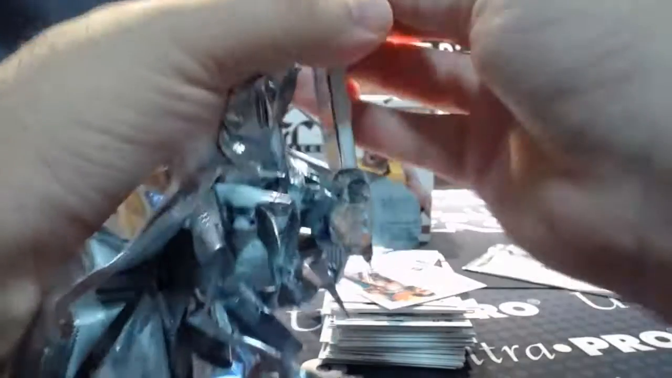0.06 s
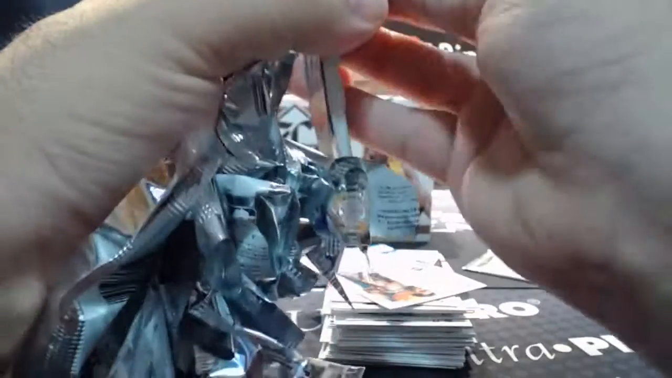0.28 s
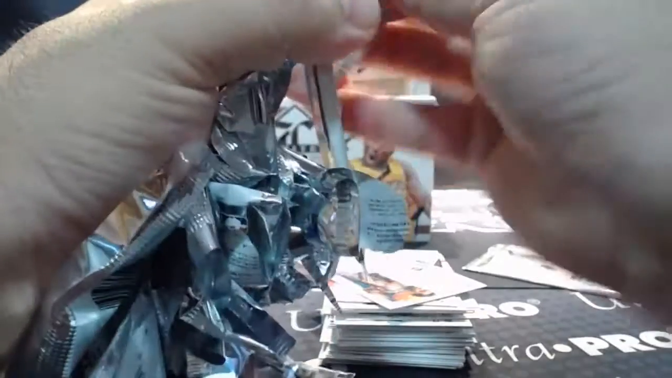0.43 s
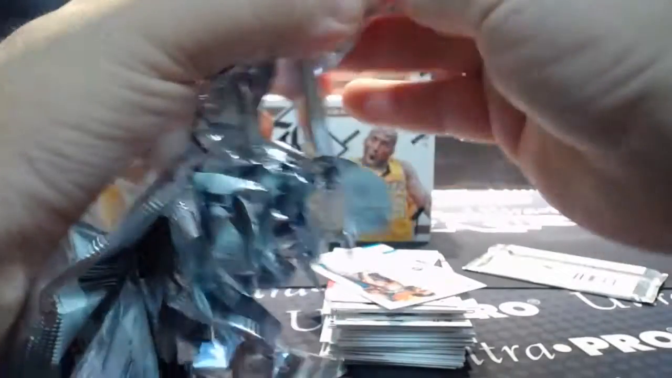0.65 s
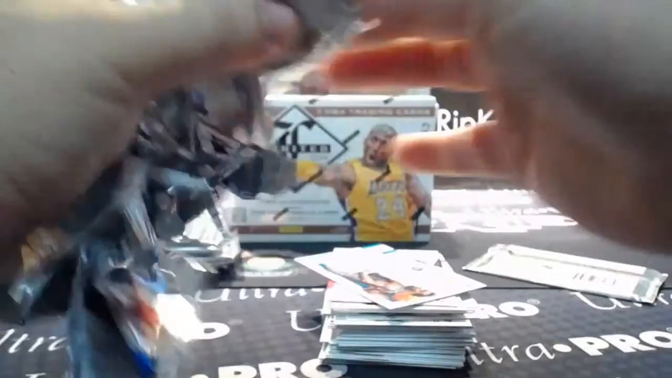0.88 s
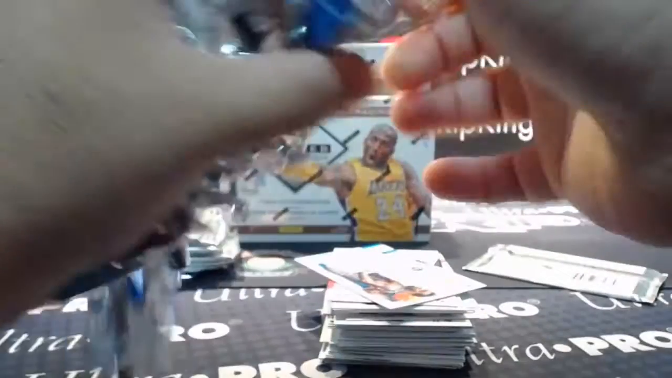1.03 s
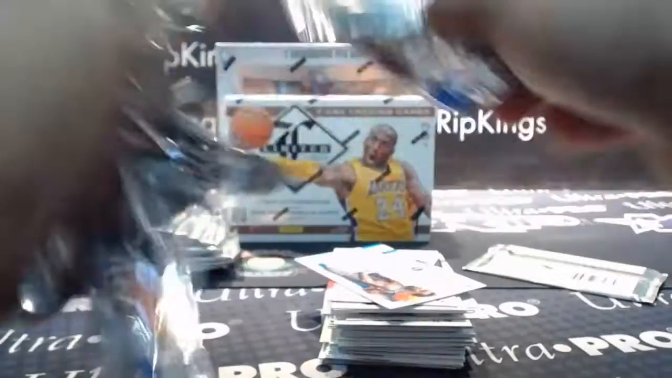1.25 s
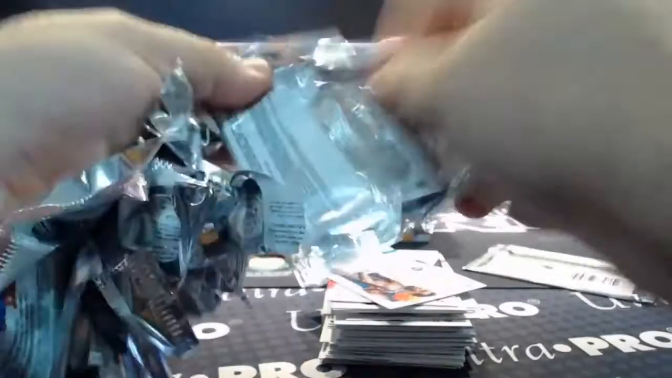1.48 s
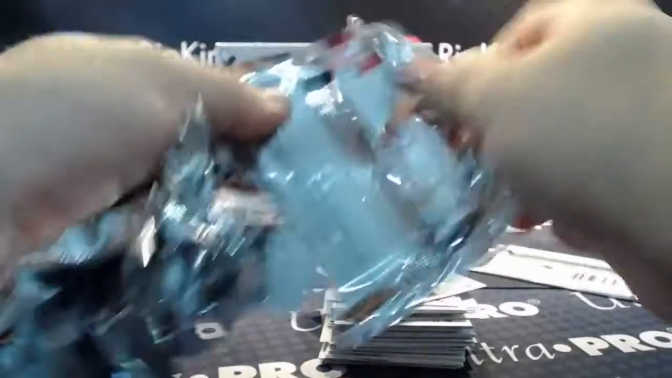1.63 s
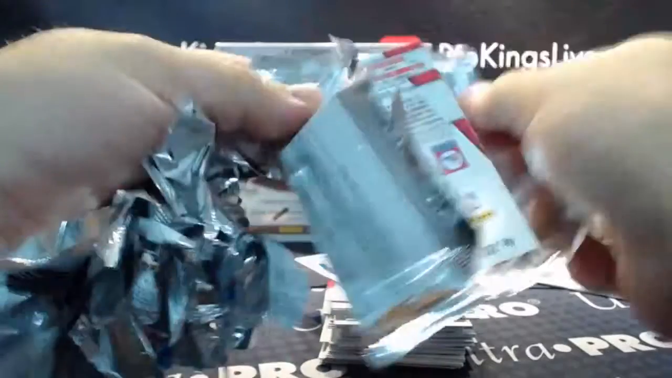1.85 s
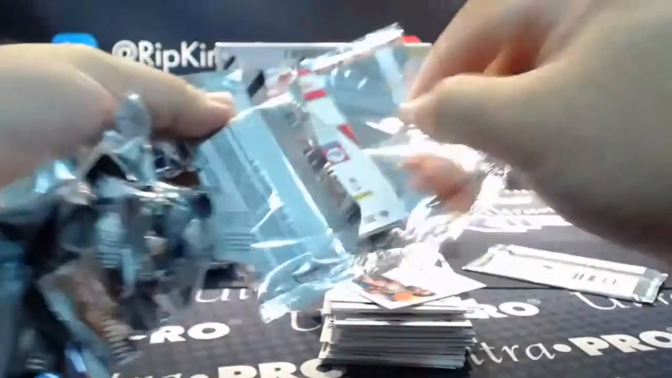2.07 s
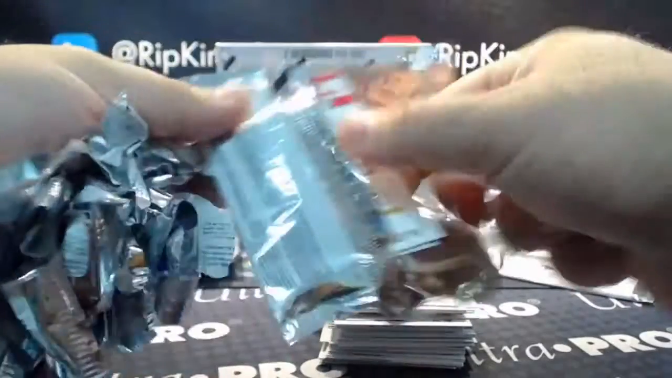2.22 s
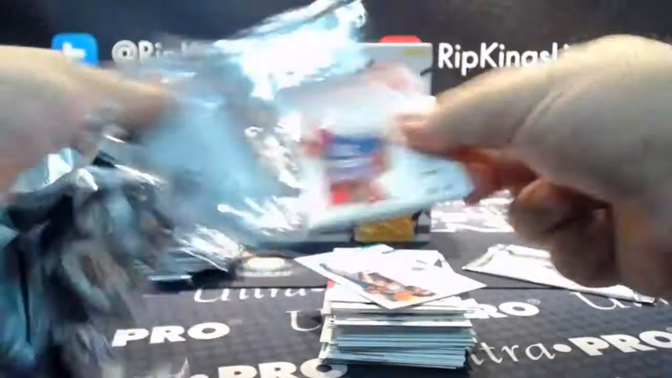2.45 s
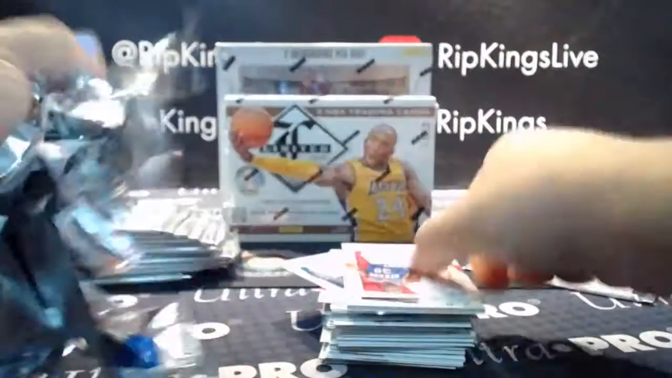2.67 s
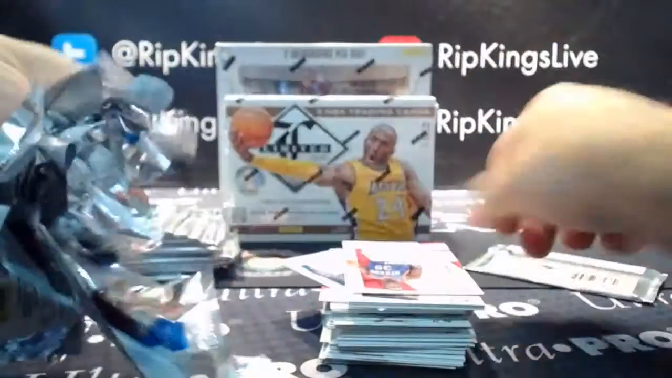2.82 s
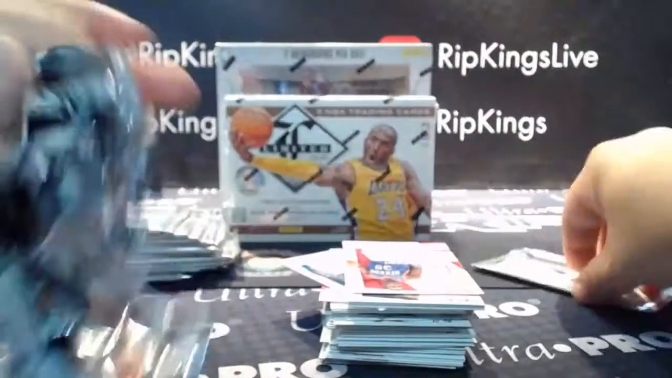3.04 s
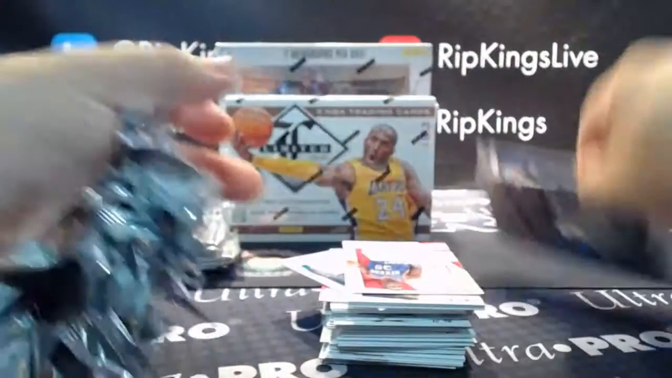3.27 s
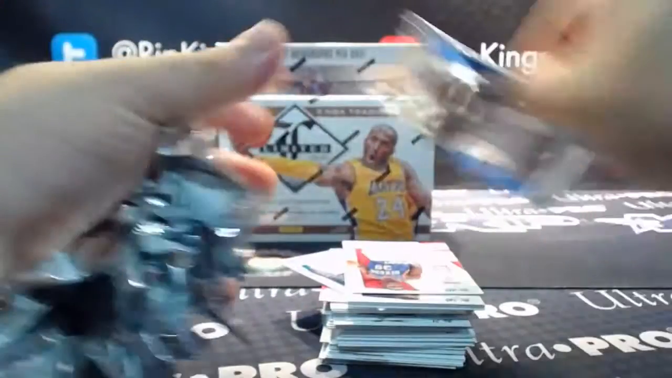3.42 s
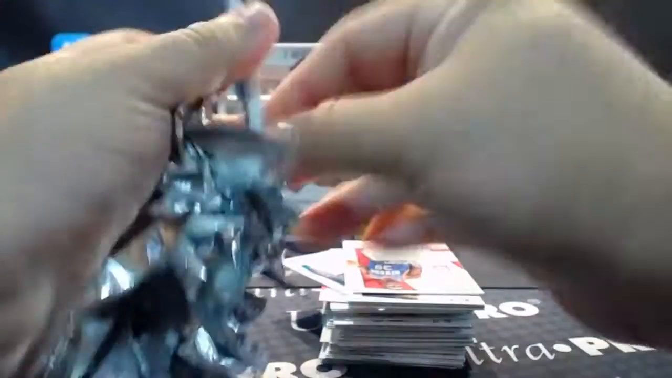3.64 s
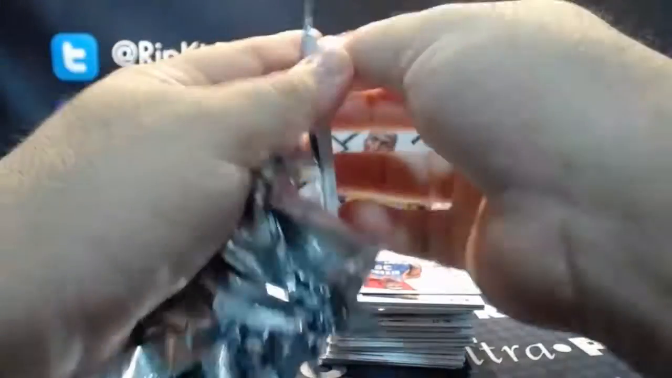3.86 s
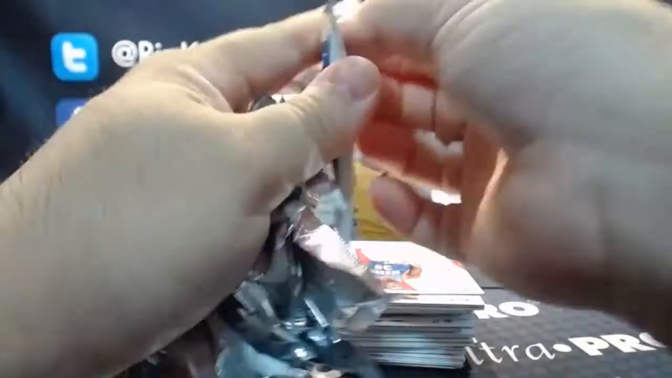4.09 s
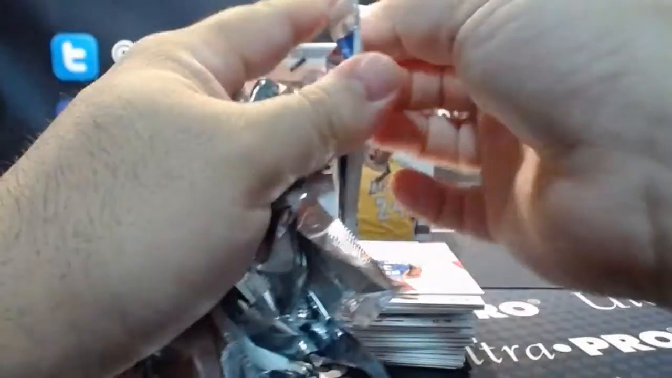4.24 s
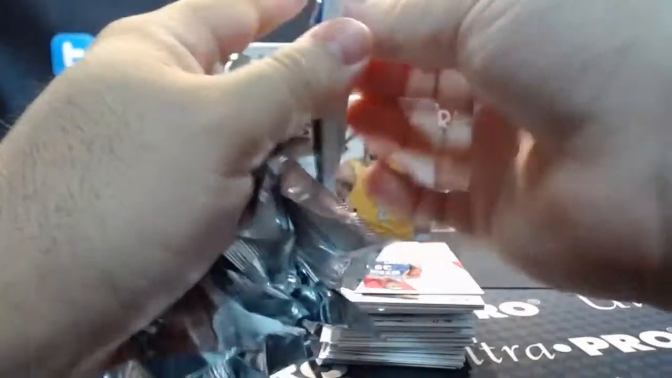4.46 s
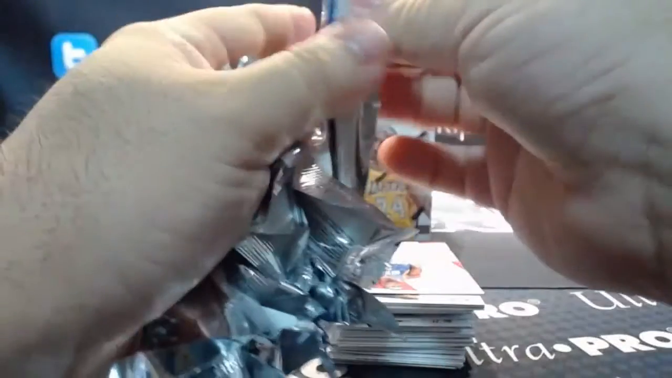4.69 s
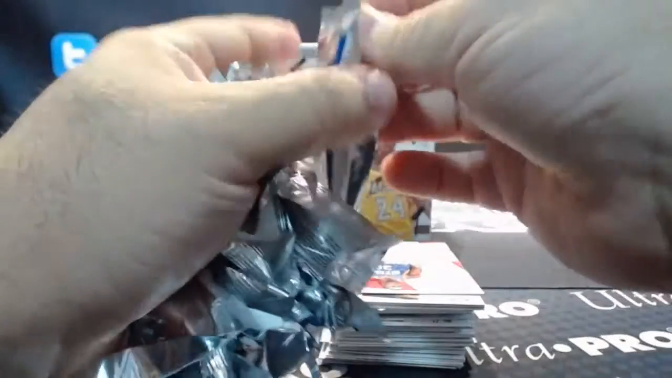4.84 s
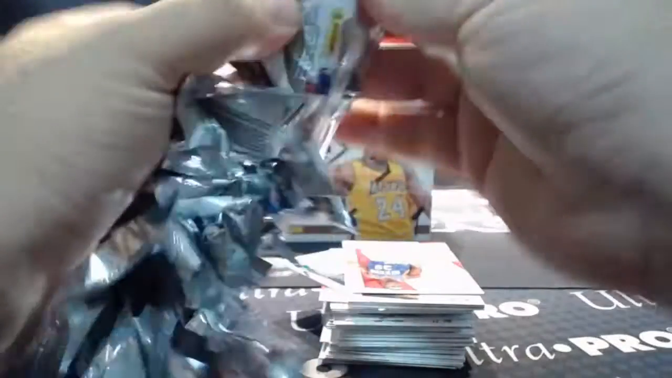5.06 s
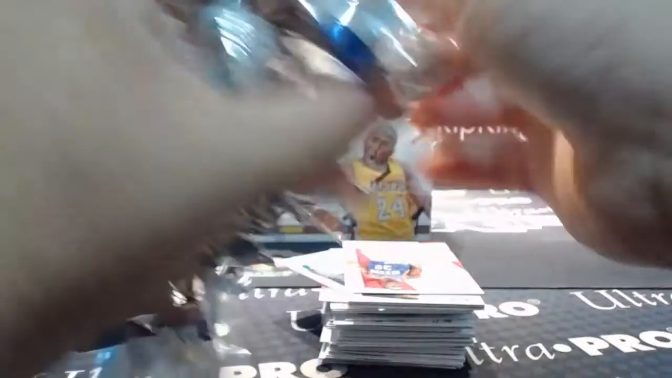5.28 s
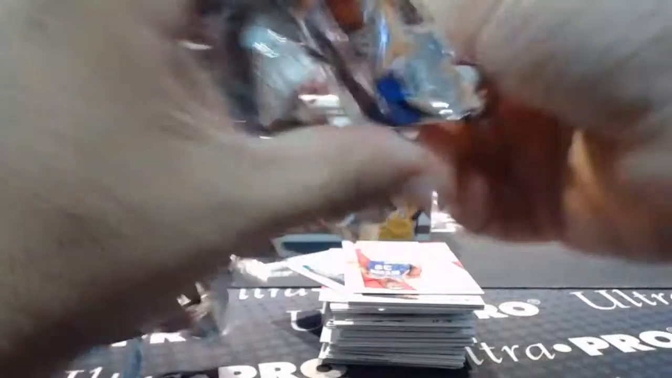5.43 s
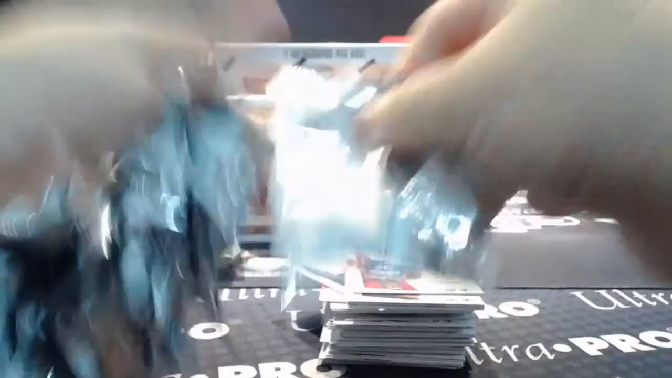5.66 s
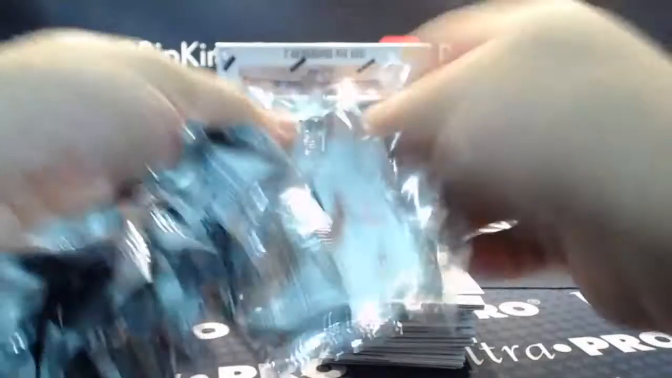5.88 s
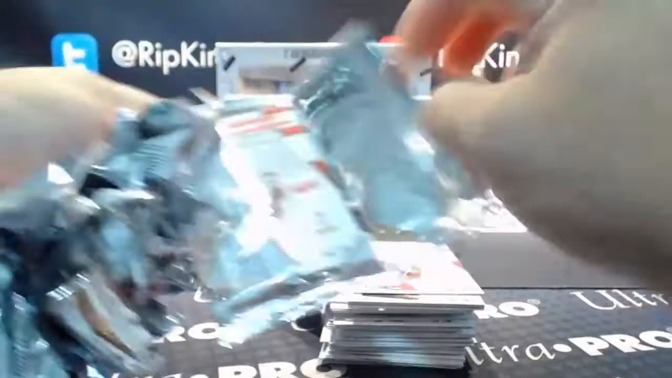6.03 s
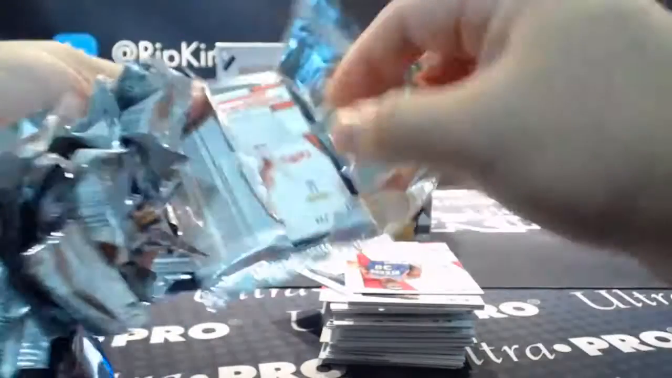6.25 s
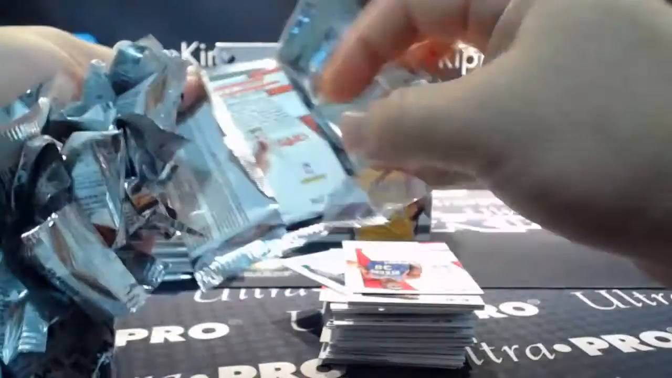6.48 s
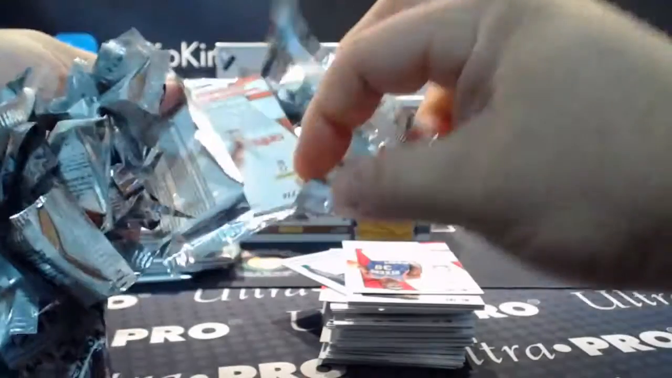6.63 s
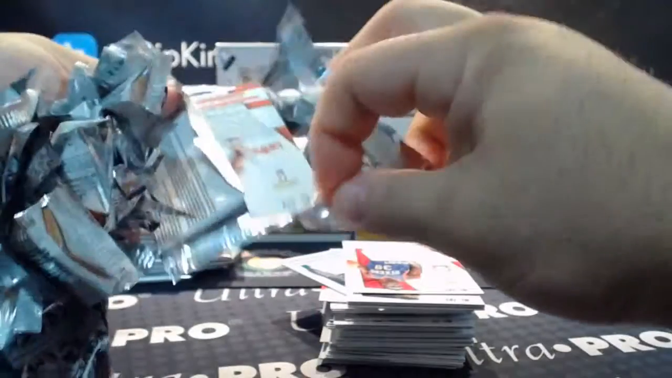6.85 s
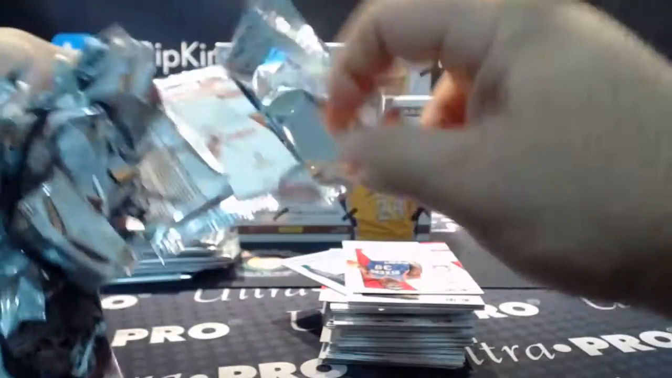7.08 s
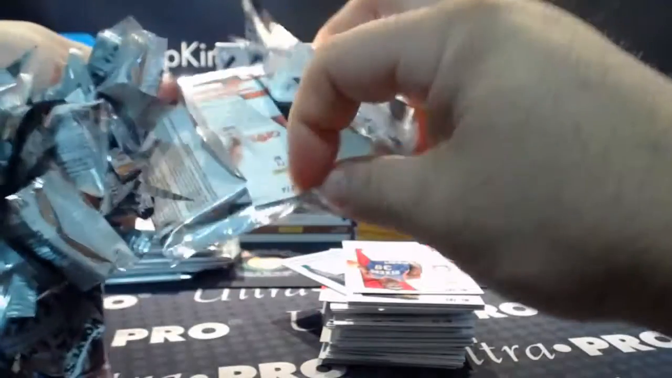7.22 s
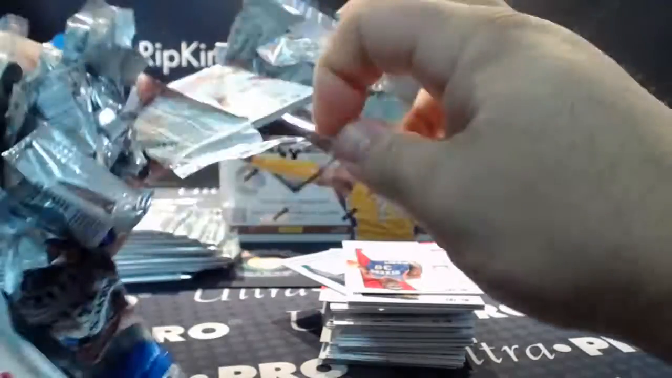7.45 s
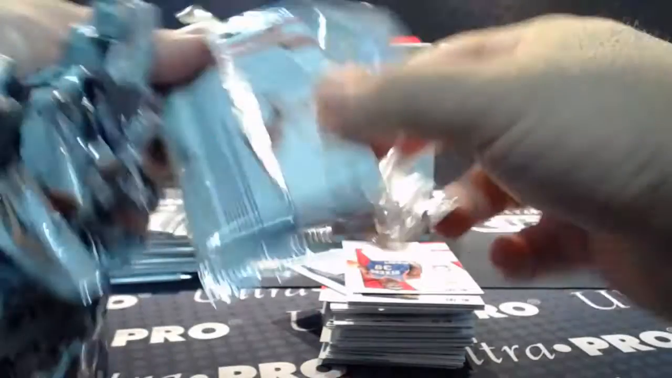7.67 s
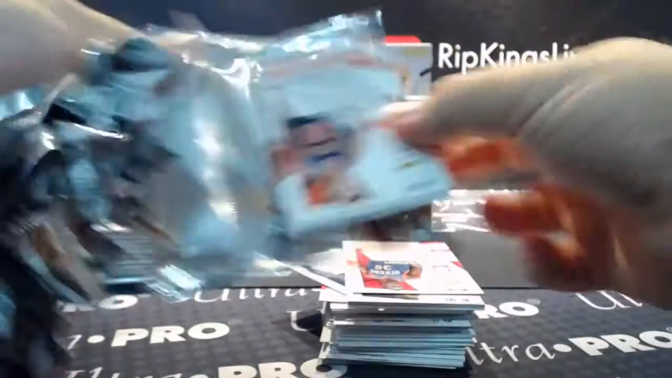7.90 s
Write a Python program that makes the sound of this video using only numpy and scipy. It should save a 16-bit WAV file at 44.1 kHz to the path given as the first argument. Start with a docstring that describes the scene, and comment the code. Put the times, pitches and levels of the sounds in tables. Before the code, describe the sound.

Close up at a desk in a small room, hands open foil packs of trading cards. Light crinkles and separate snaps lead to short loud rips, then stiff cards are worked out with low flexing and a dull knock. A quieter handling stretch follows, then another cluster of strong tears and thuds, fading to sparse ticking. Close stereo pickup, short room tail, faint steady noise and hum.

```python
"""At a desk in a small room, two hands tear open foil packs of trading cards in front of a stereo microphone.
Each squeeze or rip is a swarm of tiny creases buckling, mixed with the hiss of foil sliding on itself.
Larger creases snap one by one and ring briefly; the bunched wrappers tick as they relax.
The pack flexes in low jerks, more strongly while the stiff cards are worked out, and dull knocks are heard.
Near echoes and a short tail make the room, over steady noise and a faint electric hum."""
import sys
import numpy as np
from scipy import signal
from scipy.fft import rfft, irfft
from scipy.io import wavfile
from scipy.ndimage import uniform_filter1d, minimum_filter1d

SR = 44100
rng = np.random.default_rng(int(sys.argv[2]) if len(sys.argv) > 2 else 0)


def store_pcm(level_fs):
    """Save levels as 16-bit WAV."""
    pcm = np.round(np.clip(level_fs, -1, 1) * 32767).astype(np.int16)
    wavfile.write(sys.argv[1], SR, np.atleast_2d(pcm).T)


N = 348831


def amp(db):
    """Decibels to gain."""
    return 10 ** (np.asarray(db) / 20)


def unit(x):
    """Scales to an energy of one."""
    return x / np.sqrt(np.sum(x ** 2, -1, keepdims=True) + 1e-20)


def read(points, hz):
    """Reads a table on a log-frequency axis."""
    f, value = np.transpose(points)
    return np.interp(np.log(hz + 1), np.log(f + 1), value)


def add(mix, s, sound):
    """Mixes a sound in at a time."""
    part = mix[:, max(round(s * SR), 0):][:, :sound.shape[-1]]
    part += sound[..., :part.shape[-1]]


def bins(size=4096):
    """Frequencies on which filters are drawn."""
    return abs(np.fft.fftfreq(size, 1 / SR))


def causal(db):
    """Shortest impulse response with this gain."""
    return np.fft.ifft(np.exp(np.conj(signal.hilbert(np.log(amp(db)))))).real[:len(db) // 2]


def through(x, response):
    """Convolves both channels."""
    return signal.oaconvolve(x, np.atleast_2d(response), axes=1)[:, :N]


# the foil yields while the force is held
SAG_DB_PER_S = 25


def stroke(t, start, length, db, attack_s, release_db_per_s):
    """Power of one pull on the foil: it builds up before start, sags while held, and dies away."""
    age = t - start
    attack = np.clip(1 + age / attack_s, 0, 1) ** 4
    sag_db = SAG_DB_PER_S * np.clip(age, 0, length)
    release_db = release_db_per_s * np.maximum(age - length, 0)
    return attack * amp(db - sag_db - release_db) ** 2


# a seam gives way: (full_force_s, attack_s, length_s, level_db)
RIPS = [(1.297, .025, .033, -21.5), (2.116, .022, 0.055, -16.8), (2.48, .01, .012, -28),
        (5.396, .006, .01, -17), (5.536, .02, 0.01496, -20), (6.192, 0.011, .02, -18.5),
        (6.249, .014, 0.0068, -17)]
RIP_RELEASE_DB_PER_S, RIP_BRIGHT_DB = 678.5, -0.5
# the fingers crumple or pull the foil: (full_force_s, length_s, level_db, brightness_db)
# brightness is the power of the high crackle compared with the low crackle
SQUEEZES = [(.099, 0.034, -41, 5), (.221, .004, -43, 12), (0.47, .04, -35.5, 7), (.54, .03, -44, 5),
            (.622, 0.024, -41, 3), (.709, 0.0091, -36.5, 1.5), (.752, .038, -41, 0),
            (1.228, 0.041, -38, -0.5), (1.278, 0.078, -29, 0.5), (1.463, .1, -35.5, 5),
            (1.51, .018, -32, 2.5), (1.785, .01, -38.5, -3), (1.91, .02, -43, 1.5), (2.08, .015, -44, -4),
            (2.19, .09, -39, -5), (2.298, .014, -29, -5), (2.421, 0.0099, -37.5, -3),
            (2.496, .028, -35, -3), (2.671, 0.017, -37.5, -5), (2.945, 0.024, -45, 2), (3.02, .03, -43, 1),
            (3.054, 0.029, -37, -2.5), (3.269, 0.12, -44, 4), (3.494, .022, -39, 9),
            (3.587, 0.034, -38.5, 2), (4.052, 0.0035, -45, 5), (4.163, 0.011, -52, -9),
            (4.232, 0.011, -45, -5), (4.44, 0.11, -47, -1), (4.792, .01, -38, 14), (4.84, 0.094, -52, -4),
            (5.42, .02, -26, -2), (5.455, .022, -28.5, 0), (5.517, 0.087, -25.5, -1.5),
            (5.692, 0.029, -30, -7), (5.745, .045, -38, 1.5), (5.884, .014, -33, -0.5),
            (5.975, 0.11, -39, -4), (6.166, 0.086, -30, 0), (6.362, .012, -44, -6), (6.437, .035, -37.5, 0),
            (6.543, .012, -50.5, 2), (6.793, 0.0057, -49.5, -1), (7.167, .04, -52, 0),
            (7.236, 0.038, -48, 7), (7.377, 0.028, -56, -1), (7.586, 0.044, -50, 3),
            (7.768, .045, -44.5, 6)]
SQUEEZE_ATTACK_S, SQUEEZE_RELEASE_DB_PER_S = .028, 480
# faint rustle of the wrappers bunched in the hand: (time_s, level_db)
RUSTLE = [(0, -62), (.25, -53), (.55, -67), (.95, -63), (1.6, -50), (2, -58), (2.65, -50), (2.78, -74),
          (2.9, -50), (3.55, -47), (3.72, -59), (4.7, -66), (4.85, -51), (5.1, -59), (5.38, -53),
          (6.35, -53), (6.7, -71), (7.5, -69), (7.9, -61.5)]
RUSTLE_BRIGHT_DB = 1.5
# every snap makes the creases around it crackle on for a moment; the level is relative to the snap
FLURRY_DB, FLURRY_ATTACK_S, FLURRY_RELEASE_DB_PER_S = -21, .002, 477
FLURRY_NEUTRAL_HZ, FLURRY_BRIGHT_DB_PER_OCTAVE = 3000, 15
# the stiff cards are worked out of the opened pack: (start_s, end_s)
UNPACKING = [(1.56, 2.54), (2.8, 3.22), (4.44, 4.81), (5.68, 6.06), (6.24, 7.22)]
# flexing relative to the crackle: with the foil alone, and the part added by the cards
FLEX_FOIL_DB, FLEX_CARDS_DB = -28, -10
# above the knee the cards' part grows more slowly than the crackle; a larger lag slows it more
FLEX_KNEE_DB, FLEX_LAG = -33, .55


def effort():
    """Power over time of low crackle, high crackle and flexing, gathered from everything the hands do."""
    t = np.arange(0, N, 32) / SR  # a coarse clock is enough for hand movements
    parts = [(amp(np.interp(t, *np.transpose(RUSTLE))) ** 2, RUSTLE_BRIGHT_DB)]
    for s, attack, length, db in RIPS:
        power = stroke(t, s, length, db, attack, RIP_RELEASE_DB_PER_S)
        parts.append((power, RIP_BRIGHT_DB))
    for s, length, db, bright_db in SQUEEZES:
        power = stroke(t, s, length, db, SQUEEZE_ATTACK_S, SQUEEZE_RELEASE_DB_PER_S)
        parts.append((power, bright_db))
    for s, db, hz, ring in SNAPS:
        power = stroke(t, s, 0, db + FLURRY_DB, FLURRY_ATTACK_S, FLURRY_RELEASE_DB_PER_S)
        parts.append((power, FLURRY_BRIGHT_DB_PER_OCTAVE * np.log2(hz / FLURRY_NEUTRAL_HZ)))
    low = sum(power / (1 + amp(bright_db) ** 2) for power, bright_db in parts)
    high = sum(power / (1 + amp(-bright_db) ** 2) for power, bright_db in parts)
    unpacking = sum((t > start) & (t < end) for start, end in UNPACKING)
    slowed = (1 + (low + high) / amp(FLEX_KNEE_DB) ** 2) ** FLEX_LAG
    cards = unpacking * amp(FLEX_CARDS_DB) ** 2 / slowed
    flex = (low + high) * (amp(FLEX_FOIL_DB) ** 2 + cards)
    return np.array([np.interp(np.arange(N) / SR, t, power) for power in (low, high, flex)])


def buckles(power, idle_per_s=200, busy_per_s=3200, growth=.55, size_db=5.0, even_s=.014):
    """Clicks of very unequal size that come faster with force and share out the power."""
    rate = idle_per_s + busy_per_s * (np.sqrt(power) * 10) ** growth
    sizes = amp(size_db * np.minimum(rng.exponential(1, N), 4))
    clicks = (rng.random(N) < rate / SR) * sizes
    span = max(int(even_s * SR), 8)
    # even out the loudness, so that crowded clicks are each weaker
    return clicks / np.sqrt(abs(uniform_filter1d(clicks ** 2, span)) + 1 / span)


# colour of crackling foil: (pitch_hz, level_db)
FOIL = [(60, -22), (250, -14), (560, -13), (820, -1.5), (1400, 0), (2000, 2.5), (3000, 1.5), (4300, 1),
        (6500, 2.5), (9000, -3.5), (12500, -10), (16000, -30.5)]


def creases(hz, ring, cycles, tick_s, crack=0, size=256):
    """Buckling creases: a sharp crack, a rough tick and a few cycles of the facet's own tone."""
    # the result has the shape (events, centre and side, samples)
    t = np.arange(size) / SR
    hz, ring = hz[:, None, None], np.clip(ring, 0, 1)[:, None, None]
    tick = unit(rng.standard_normal((len(hz), 2, size)) * np.exp(-t / tick_s))
    tick = np.roll(tick + crack * np.sign(tick) * (t == 0), 8, -1)  # 8 samples later
    colour = rfft(causal(read(FOIL, bins(size=512))), 2 * size)
    tick = unit(irfft(rfft(tick, 2 * size) * colour)[..., :size])
    age = t / (cycles / hz + tick_s / 2)
    wave = np.sin(2 * np.pi * (hz * t + rng.random((len(hz), 2, 1))))
    tone = unit(age * np.exp(-age) * wave)
    return unit(np.sqrt(1 - ring) * tick + np.sqrt(ring) * tone)


def facet_pitch(at, own, patch_s=.009, scatter=.6):
    """Creases that buckle close in time lie on one patch of foil, so their pitches (0-1) are alike."""
    patch = (at / SR / max(patch_s, .002)).astype(int)  # the patch under the fingers keeps changing
    return (rng.random(N)[patch] + scatter * own) % 1


# share of sliding at rest and at full force (0-1), the level halfway between, and the averaging time
SLIDE_REST, SLIDE_FULL, SLIDE_HALF_DB, SLIDE_S = .12, 0.42, -46, 0.064


def sliding_share(power):
    """Under a light touch foil mostly buckles; under sustained force it slides on itself more."""
    held = abs(uniform_filter1d(power, max(int(SLIDE_S * SR), 1)))
    force = held / (held + amp(SLIDE_HALF_DB) ** 2)
    return np.clip(SLIDE_REST + (SLIDE_FULL - SLIDE_REST) * force, 0, 1)


def crackle(low, high, rest_db=-74, split_hz=3500, ring=0.52, lowest_hz=800, highest_hz=9500,
            hiss_hz=9500, jerk_db=2.5, jerk_s=.007):
    """Every click flips a facet of another size, over the hiss of sliding foil, never quite still."""
    clicks, buckling = buckles(low + high), np.zeros((2, N))
    at = np.flatnonzero(clicks)
    pitch, share = rng.random((len(at), 2)).T
    facet_hz = lowest_hz * (highest_hz / lowest_hz) ** facet_pitch(at, pitch)
    grains = creases(facet_hz, 2 * ring * share, cycles=0.71, tick_s=0.00038)
    for i, grain in zip(at, grains):
        add(buckling, i / SR, clicks[i] * grain)
    softer = -10 * np.log10(1 + (bins() / hiss_hz) ** 4)  # sliding has less treble than buckling
    hiss = through(rng.standard_normal((2, N)), unit(causal(read(FOIL, bins()) + softer)))
    sliding = sliding_share(low + high)
    # the foil sticks and gives
    jerks = np.interp(np.arange(N) / SR / jerk_s, np.arange(N), rng.standard_normal(N))
    foil = (np.sqrt(1 - sliding) * buckling + np.sqrt(sliding) * hiss) * amp(jerk_db * jerks)
    dull = signal.sosfiltfilt(signal.butter(3, split_hz, fs=SR, output="sos"), foil)
    layers = ((dull, low), (foil - dull, high))
    rest = amp(rest_db) ** 2 / 2
    return sum(part / part[0].std() * np.sqrt(power + rest) for part, power in layers)


# single large creases snapping through: (time_s, level_db, foil_facet_pitch_hz, ringing_share 0-1)
SNAPS = [(.006, -36, 5200, 0.63), (0.1163, -30, 2210, .6), (0.147, -39, 4800, 0.8),
         (0.2245, -26.5, 7080, 0.74), (.3017, -29, 6600, 0.7), (.551, -29, 4080, 0.3),
         (.603, -31.5, 5660, 0.56), (.6249, -28.5, 3630, 0.3), (.6476, -35.5, 1850, .7),
         (.7, -28.5, 1810, 0.56), (0.7701, -31, 5230, .4), (0.7912, -23, 5040, 0.42),
         (0.906, -35, 1850, 0.82), (.995, -25, 1840, 0.58), (1.063, -17, 1990, 0.87),
         (1.071, -24, 4380, 0.4), (1.1069, -32, 7410, .7), (1.1307, -30, 8470, .2),
         (1.2289, -30.5, 2145, 1), (1.2543, -27.5, 2070, 0.97), (1.272, -20.5, 1860, 0.44),
         (1.3947, -33, 6600, 0.25), (1.5174, -19.5, 6740, 0.3), (1.5545, -20.5, 4855, 0.5),
         (1.571, -27, 1900, 0.7), (1.623, -32, 7550, .1), (1.673, -31, 4900, 0.86),
         (1.6932, -37, 4470, 0.6), (1.7154, -36, 5220, 0.56), (1.778, -31, 2580, 0.7),
         (2.476, -18, 3070, .5), (2.486, -18, 2910, 0.51), (2.682, -28, 3860, 0.56),
         (2.9703, -32, 2845, 0.72), (3.0722, -23.5, 2580, 0.53), (3.1981, -34.5, 5850, 0.66),
         (3.2388, -36, 1182, 0.94), (3.54, -30, 5445, 0.5), (3.8151, -33, 4182, 0.93),
         (3.9322, -37.5, 950, 0.7), (3.9956, -33, 9480, 0.97), (4.2332, -24.5, 8090, 0.6),
         (4.2437, -25, 4080, 0.36), (4.341, -34.5, 6170, 0.8), (4.3807, -36, 3353, 0.92),
         (4.3965, -40.5, 4030, 0.6), (4.4361, -31, 4100, 0.47), (4.449, -32.5, 932, 0.3),
         (4.5019, -33, 5213, .3), (4.61, -38, 6055, 0.57), (4.7895, -22.5, 7110, .75),
         (4.8382, -35.5, 4965, 0.61), (4.8822, -20, 4808, 0.98), (4.928, -36.5, 5210, 0.51),
         (5.1293, -31, 2816, 0.21), (5.286, -37.5, 6915, 0.31), (5.513, -22, 5500, 0.19),
         (5.6553, -32, 11600, .3), (5.684, -28.5, 850.6, 0.65), (5.714, -25.5, 5000, .25),
         (5.7512, -30.5, 1950, 0.6), (5.8682, -29.5, 3170, 0.17), (5.8898, -26.5, 6273, 0.3),
         (6.0548, -32, 3186, 0.63), (6.1608, -23, 4205, 0.21), (6.4313, -29.5, 4190, 0.51),
         (6.862, -35.5, 1940, 0.46), (7.0514, -39, 3510, 0.47), (7.2271, -36.5, 4136, 0.87),
         (7.2798, -36, 1881, 0.32), (7.5922, -36, 5585, 0.11), (7.7041, -38.5, 6706, 0.51),
         (7.779, -29.5, 3977, 0.44)]


def snaps(sheet_ratio=.56, sheet_db=-15):
    """Large creases flip one at a time and set the wider sheet ringing lower."""
    out, (s, level_db, hz, ring) = np.zeros((2, N)), np.transpose(SNAPS)
    facets = creases(hz, ring, cycles=0.52, tick_s=0.00048, crack=0.39)
    sheets = creases(hz * sheet_ratio, np.ones(len(hz)), cycles=0.54, tick_s=0.00048)
    gains = amp(level_db) * np.sqrt(.003 * SR)  # each snap's energy equals 3 ms at its level
    for start, gain, grain in zip(s, gains, unit(facets + amp(sheet_db) * sheets)):
        add(out, start, gain * grain)
    return out


def settling(power, per_s=34, db=-46.5, size_db=4.5, lowest_hz=2000, highest_hz=9000,
             pressed_db=23, half_db=-58):
    """The bunch of empty wrappers in the hand keeps relaxing with separate ticks, louder when pressed."""
    out = np.zeros((2, N))
    gap, size, pitch, ring = rng.random((400, 4)).T  # more ticks than fit in the time
    facet_hz = lowest_hz * (highest_hz / lowest_hz) ** pitch
    grains = creases(facet_hz, ring, cycles=0.43, tick_s=0.00045)
    times = np.cumsum(-np.log(gap)) / per_s
    gains = amp(db - size_db * np.log(size + .04))
    for s, gain, grain in zip(times, gains, grains):
        add(out, s, gain * grain)
    return out * amp(pressed_db * power / (power + amp(half_db) ** 2))


# colour of the flexing pack: (pitch_hz, level_db)
FLEX = [(25, -27), (80, -9.5), (200, -5.5), (370, 0.5), (520, -4.5), (900, -15), (3000, -41)]


def flexing(power):
    """The pack as a whole gives way in low, dull jerks."""
    jerks = buckles(power) * rng.choice([-1, 1], (2, N)) * np.sqrt(power)
    return through(jerks, unit(causal(read(FLEX, bins()))))


# dull knocks of fingers and cards on pack and desk: (time_s, level_db, pitch_hz)
KNOCKS = [(2.162, -19, 350.3), (2.42, -35, 214), (2.476, -25, 307), (3.24, -33, 80.2), (3.504, -46, 70),
          (3.932, -26, 275), (5.402, -17.5, 950), (5.701, -28.5, 294.2), (5.713, -24, 496),
          (6.251, -29, 105), (6.252, -23, 175), (6.254, -16.5, 351.5), (6.79, -35, 373),
          (7.817, -35, 800.5)]
# time to fade by 60 dB at this pitch; higher knocks die sooner
KNOCK_T60_S, KNOCK_HZ, KNOCK_DAMPING = .072, 296, .35


def knocks(rough=0.45, soft_cycles=0.25, lowest_hz=45):
    """Heavily damped thuds, part tone and part rattle, cushioned by the fingers."""
    out, t = np.zeros((2, N)), np.arange(SR // 4) / SR
    for s, db, hz in KNOCKS:
        t60 = KNOCK_T60_S * (KNOCK_HZ / hz) ** KNOCK_DAMPING
        band = signal.butter(2, [hz * 0.47, hz * 1.65], "band", fs=SR, output="sos")
        rattle = signal.sosfilt(band, rng.standard_normal((2, len(t))))
        tone = np.outer([1, 0], np.sin(2 * np.pi * hz * t))  # centre only
        fade = amp(db - 60 * t / t60) * (1 - np.exp(-t * hz / soft_cycles))
        add(out, s, fade * (tone + rough * rattle / rattle.std()))
    return signal.sosfilt(signal.butter(2, lowest_hz, "high", fs=SR, output="sos"), out)


# echoes from desk, box and screen: (delay_s, level_db)
ECHOES = [(.0019, -11), (.0034, -13.5), (.0052, -18.5), (.0078, -19.5), (0.0087, -51), (0.014, -34)]
# how long the room rings at each pitch: (pitch_hz, time_to_fade_60_db_s)
ROOM = [(150, 0.18), (1000, 0.36), (4000, 0.24), (9000, 0.14), (16000, 0.3186)]


def room(x, tail_db=-18.0, build_s=0.0057):
    """A few near echoes, and a short tail of noise in which each pitch fades at its own rate."""
    hz, t, z = signal.stft(rng.standard_normal((2, SR // 2)), SR, nperseg=256)
    tail = signal.istft(z * amp(-60 * t / read(ROOM, hz)[:, None]), SR, nperseg=256)[1]
    build = 1 - np.exp(-(np.arange(tail.shape[1]) / SR / build_s) ** 2)
    response = amp(tail_db) * unit(tail * build)
    for delay, db in ECHOES:
        burst = rng.standard_normal((2, 24)) * np.exp(-np.arange(24) / 6)  # blurs the echo
        add(response, delay, amp(db) * unit(burst))
    return x + through(x, response)


# colour of the steady room noise: (pitch_hz, level_db)
AIR = [(20, -6), (60, 0), (120, -1.5), (200, 3.5), (360, 3.5), (560, -9.5), (950, -9), (1400, -12),
       (1900, -20), (3500, -20.5), (8000, -33), (16000, -30.5)]
AIR_DB = -61.5
# faint electric hum: (pitch_hz, level_db)
HUM = [(118.4, -66.5), (473.7, -75)]


def air():
    """Steady room noise is coloured random noise; the faint electric hum is a set of pure tones."""
    noise = amp(AIR_DB) * through(rng.standard_normal((2, N)), unit(causal(read(AIR, bins()))))
    t = np.arange(N) / SR
    tones = [amp(db) * np.sqrt(2) * np.sin(2 * np.pi * (hz * t + rng.random())) for hz, db in HUM]
    return noise + sum(tones)


# resonances and notches between hands, desk and microphone: (pitch_hz, width_hz, level_db)
NOOK = [(365, 33, 3), (950, 310, 4), (1376, 343, -7.5), (1898, 176, 1), (2360, 168, -5), (2660, 600, 0.5)]
# colour of the sound that differs between the two microphone ports: (pitch_hz, level_db)
SPREAD = [(40, -3), (120, -22), (330, -17), (1000, -9.5), (2200, -8), (4000, -5.5), (8000, -0.5),
          (16000, 0.5)]


def scene(side_db=1.33, left_db=0.7, low_hz=110):
    """All sources as centre and side, the foil coloured by the desk, then spread to left and right."""
    low, high, flex = effort()
    nook = causal(sum(db / (1 + (2 * (bins() - hz) / width) ** 2) for hz, width, db in NOOK))
    foil = through(crackle(low, high) + snaps() + settling(low + high) + flexing(flex), nook)
    # a thin sheet radiates little bass
    foil = signal.sosfilt(signal.butter(1, low_hz, "high", fs=SR, output="sos"), foil)
    centre, side = room(foil + knocks()) + air()
    side = through(side[None], causal(read(SPREAD, bins()) + side_db))[0]
    left = np.append(0, (centre + side)[:-1])  # the sound reaches the left port one sample later
    return np.array([left * amp(left_db / 2), (centre - side) * amp(-left_db / 2)])


# treble above this is cut
EDGE_HZ = 16550


def record(dry, ceiling=0.8):
    """A fast limiter holds down the loudest peaks; then a filter cuts the highest treble."""
    gain = ceiling / np.maximum(abs(dry).max(0), ceiling)
    gain = uniform_filter1d(minimum_filter1d(gain, size=89), size=89)
    lowpass = signal.firwin(511, EDGE_HZ, window=("kaiser", 9), fs=SR)
    return signal.oaconvolve(dry * gain, lowpass[None], "same")


dry = scene()
out = record(dry)
store_pcm(out)
```